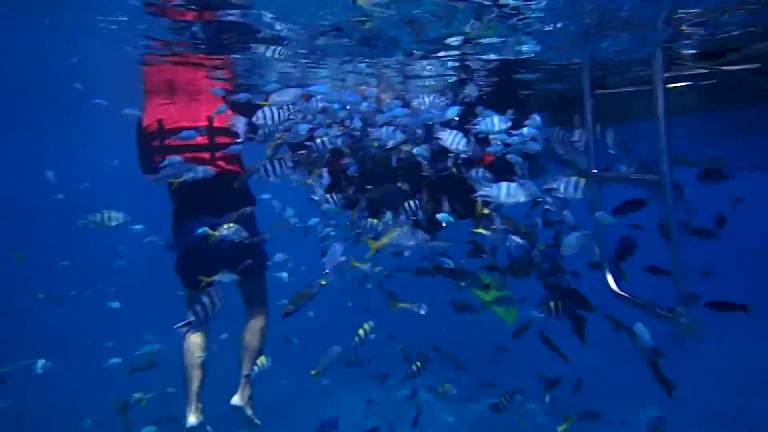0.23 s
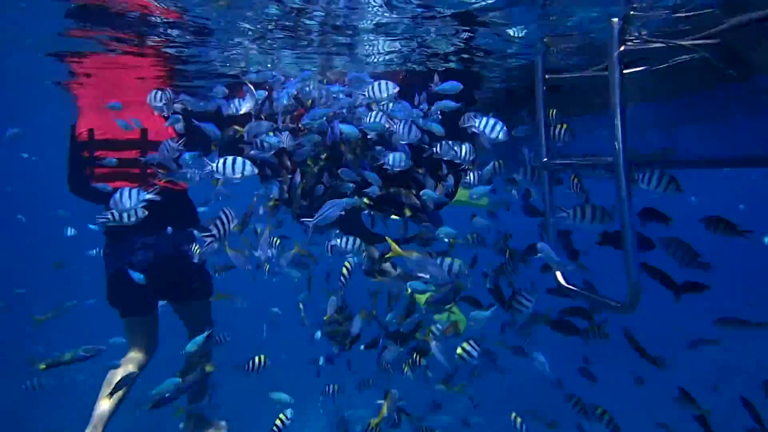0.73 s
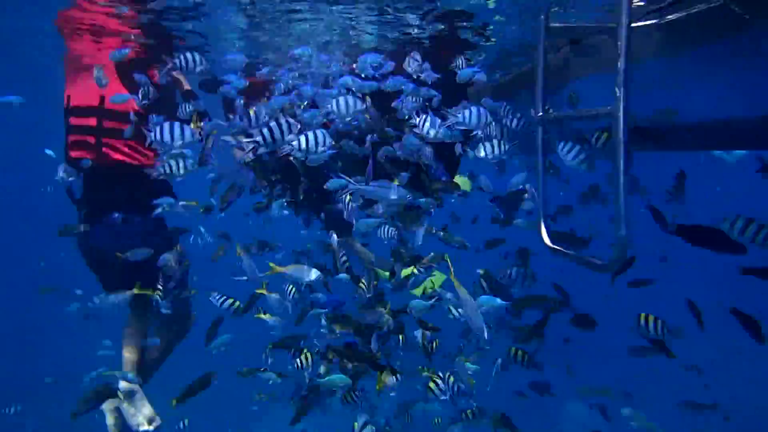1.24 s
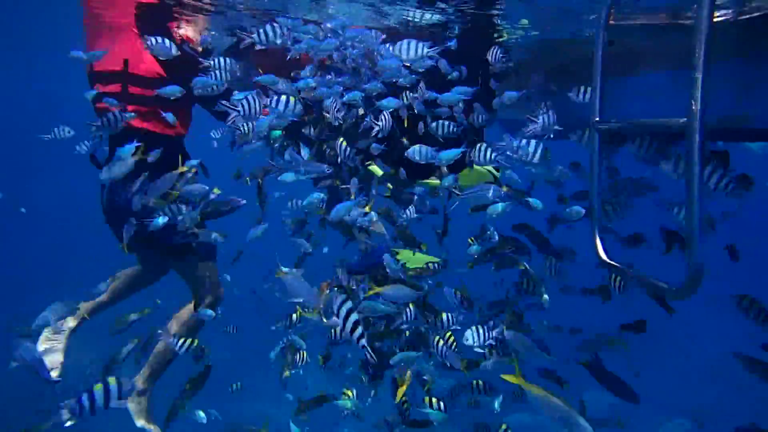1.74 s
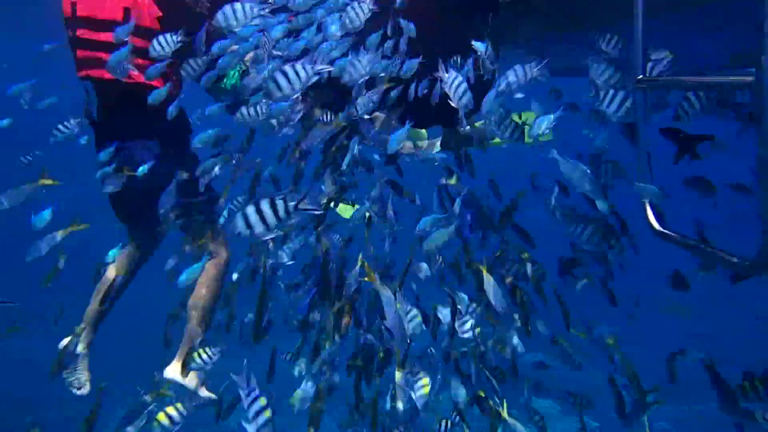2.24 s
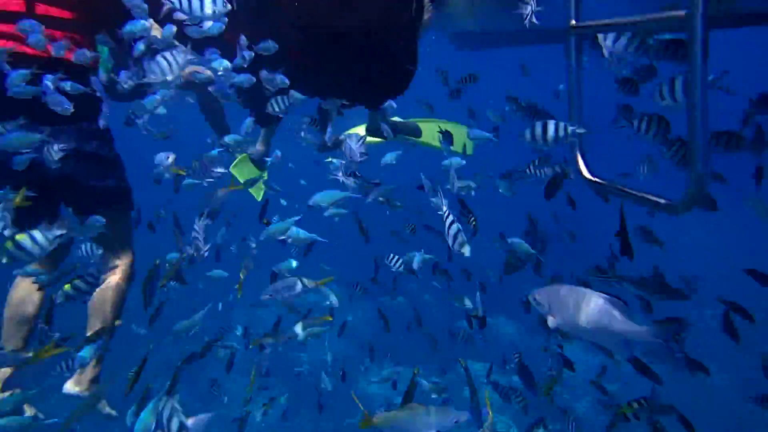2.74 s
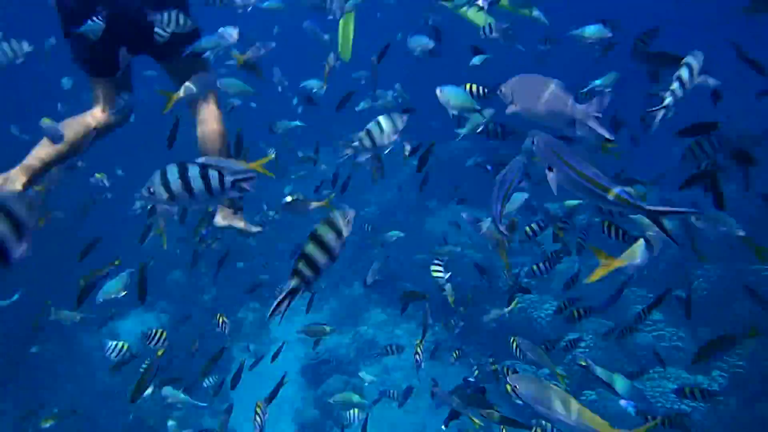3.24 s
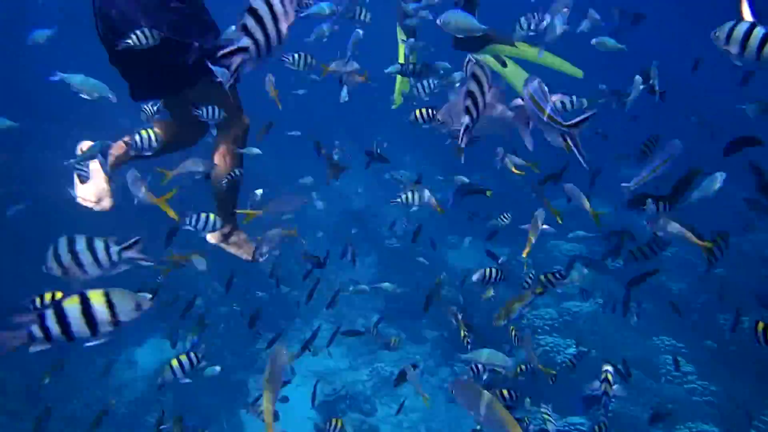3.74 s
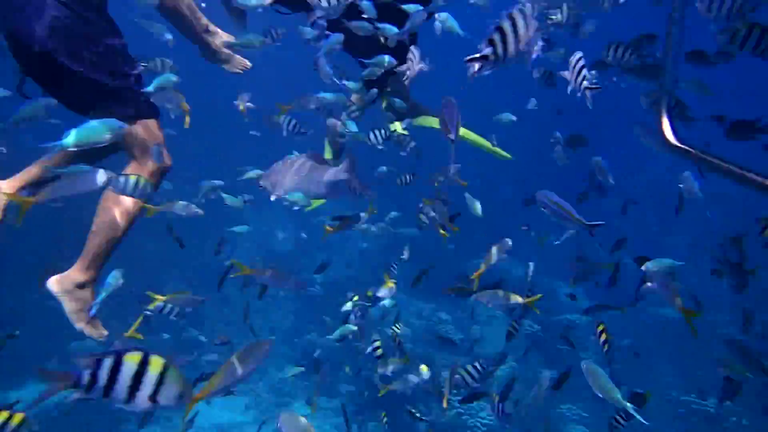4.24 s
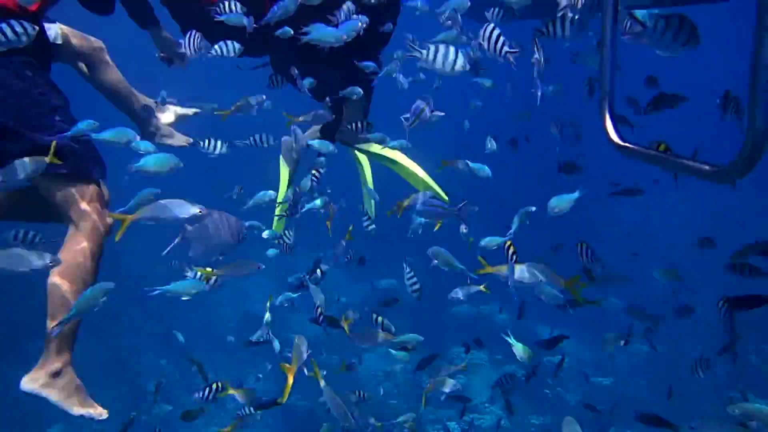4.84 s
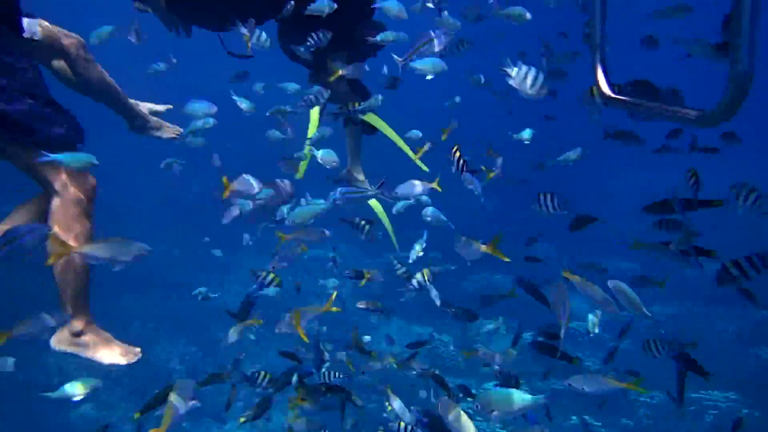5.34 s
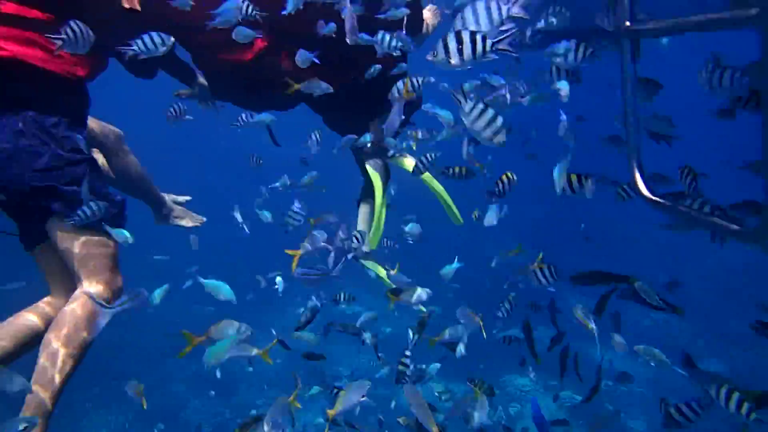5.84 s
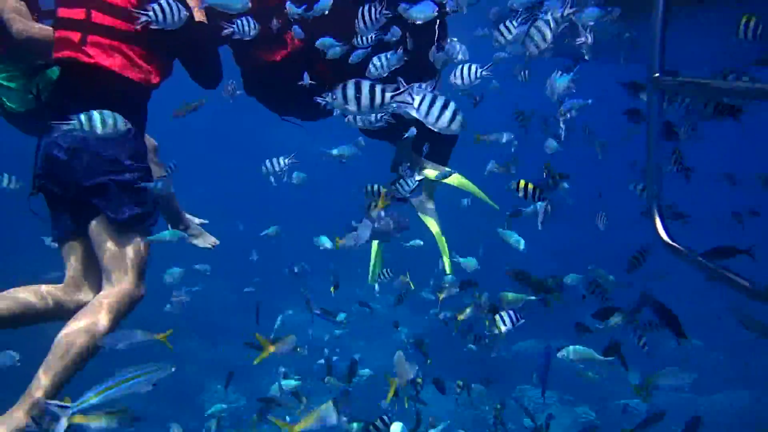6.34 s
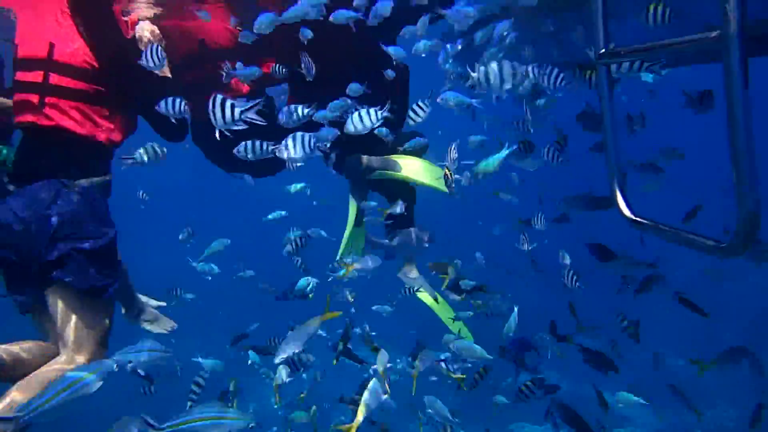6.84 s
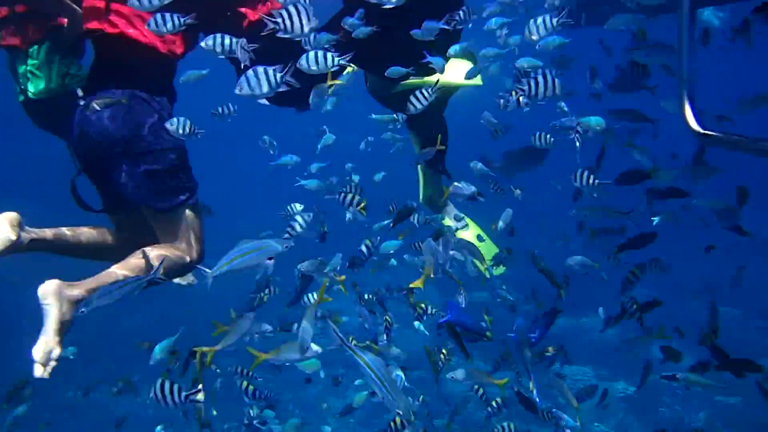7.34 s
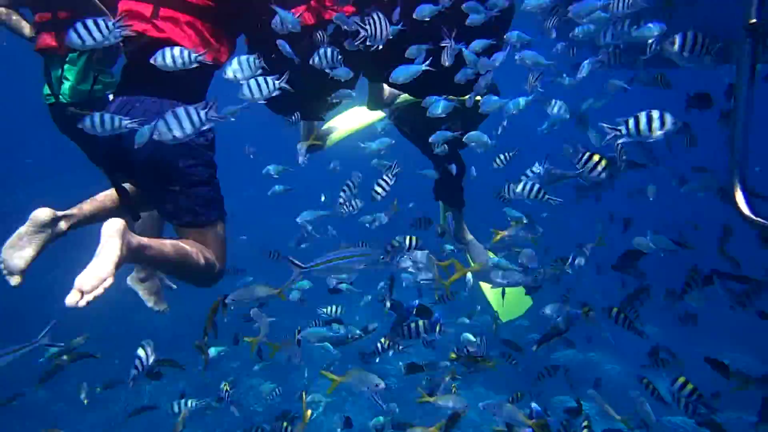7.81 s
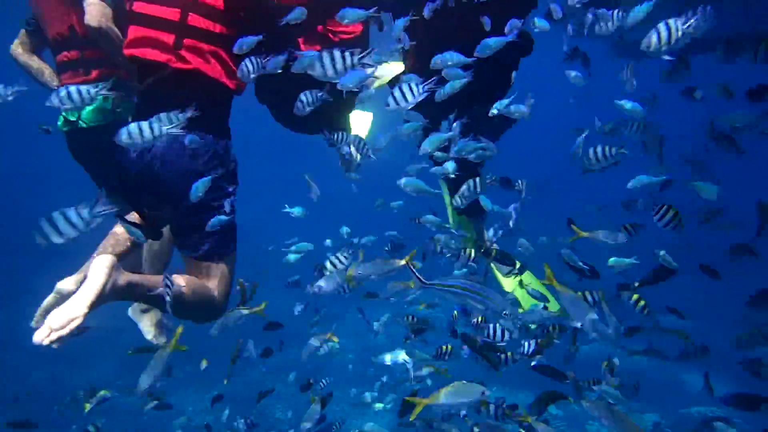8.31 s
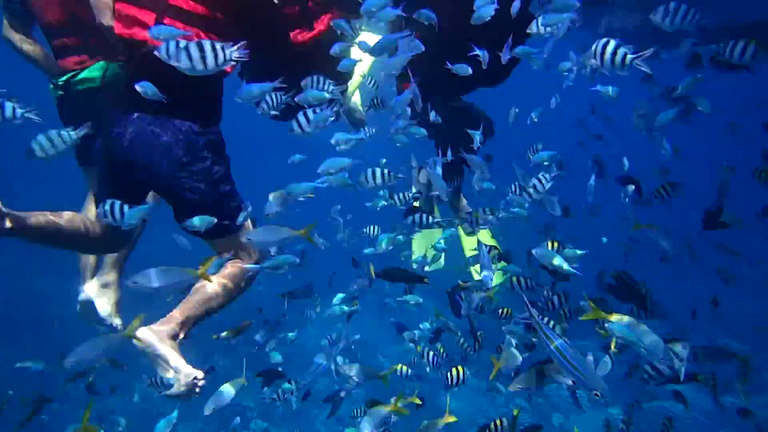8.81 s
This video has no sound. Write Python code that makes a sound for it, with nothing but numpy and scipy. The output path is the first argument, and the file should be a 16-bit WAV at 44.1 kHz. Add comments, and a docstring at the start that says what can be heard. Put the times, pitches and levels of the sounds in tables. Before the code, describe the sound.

A sealed camera underwater picks up bubbles popping and glugging close by, water washing round a hull and dull taps on its case. Behind them an idling engine holds its buzzing hum, and reef crackle spits dry ticks without pause. Bubbling is thickest in the first three seconds, thinner mid-way, then busier again toward the end. The steady background ducks suddenly after bumps and climbs back.

```python
"""Under water beside a moored boat

A steady engine drones through the hull as damped-sine bubbles and shaped noise make slosh, gurgle and wash.
Reef snaps, from fizz to single cracks, are spikes ringing a sealed camera housing, which also takes blunt taps.
Two microphone ports hear it all with unequal gain and phase, over hiss; the level of the steady sounds
drops at listed moments and climbs back.
"""
import sys
import numpy as np
from scipy import signal
from scipy.fft import rfft, irfft, next_fast_len
from scipy.io import wavfile
from scipy.ndimage import uniform_filter1d, minimum_filter1d, map_coordinates

SR = 44100
rng = np.random.default_rng(int(sys.argv[2]) if len(sys.argv) > 2 else 0)


def dump_mix(stems):
    """Bounce the given channels to the path in sys.argv[1] as a 16-bit WAV at rate SR."""
    frames = np.atleast_2d(stems).T  # one column per channel
    limited = np.clip(frames, -1, 1)  # hard clip at full scale
    pcm = np.round(limited * 32767).astype(np.int16)
    wavfile.write(sys.argv[1], SR, pcm)


N = 399987
T = np.arange(N) / SR  # seconds

NOTCH_HZ, FLANK_HZ = 3400, 5420  # between the housing's two cavity resonances; flank of the high one meets its top
# Colour of the sealed housing. Each row: frequency in Hz, relative level in dB.
HOUSING_COLOUR = [(900, -14), (1500, -13.5), (2400, -6), (3000, -9.5), (3600, -11), (4000, -22),
                  (4400, -16), (5500, -2.5), (6050, -0.5), (6300, 2.5), (6550, -0.5), (6900, -12),
                  (8500, -21.5), (9500, -21.5), (16000, -31.5)]


def amp(db):
    """Gain of a level in dB."""
    return 10 ** (np.asarray(db) / 20)


def unit(x):
    """x at rms 1."""
    return x / np.sqrt(np.mean(x ** 2) + 1e-20)


def along(points, hz, column=1):
    """One column of a table of frequencies, read on a log axis."""
    rows = np.transpose(points)
    return np.interp(np.log(hz + 1), np.log(rows[0] + 1), rows[column])


def closed(points):
    """The gain of a spectrum that falls away outside its ends."""
    below, above = (points[0][0] / 2, -80), (points[-1][0] * 2, -80)
    return lambda hz: amp(along([below, *points, above], hz))


def wobble(rate):
    """A smooth random curve, rate knots a second."""
    knots = rng.standard_normal(int(N * rate / SR) + 4)
    return map_coordinates(knots, [np.arange(N) * rate / SR])


def noise():
    """White noise."""
    return rng.standard_normal(N)


def filtered(x, response):
    """x times a complex response of frequency."""
    m = next_fast_len(N + 8192)
    return irfft(rfft(x, m) * response(np.fft.rfftfreq(m, 1 / SR)), m)[..., :N]


def causal(gain):
    """The minimum-phase response with this gain shape, peak 1: a spike rings after it, never before."""
    def response(hz):
        cepstrum = irfft(np.log(gain(hz) + 1e-6))
        half = len(cepstrum) // 2
        ring = np.exp(rfft(np.r_[cepstrum[0], 2 * cepstrum[1:half], np.zeros(half)]))
        return ring / np.abs(irfft(ring)).max()
    return response


def ports(x, diffuse):
    """One sound at both ports: unequal gain, the right turned later, and for diffuse sound a scrambled part."""
    # Port differences. Each row: frequency in Hz, left minus right in dB, left lead in radians, likeness 0-1.
    port_pair = [(90, -2.6, 0.1, 0.7), (300, -4.2, -0.0, 0.98), (430, -7.1, 0.2, 0.91),
                 (500, -8.6, 0.9, 0.84), (570, -4.0, 1.1, 0.78), (700, -0.5, 0.4, 0.92),
                 (1000, 0.4, 0.1, 0.98), (2000, 0.1, -0.2, 0.93), (2500, -3.2, -0.5, 0.88),
                 (2900, -7.6, -0.2, 0.81), (3200, -6.1, 0.7, 0.64), (4500, -2.2, 1.4, 0.88),
                 (6300, 3.7, 2.4, 0.85), (6800, 8.2, 4.4, 0.19), (7200, 5.6, 6.4, 0.67),
                 (8500, -0.6, 7.7, 0.62), (10000, -1.3, 9.4, 0.4), (12000, -3.5, 7.6, 0.26)]
    half_gain = lambda hz: amp(along(port_pair, hz) / 2)
    angle = lambda hz: diffuse * np.arccos(np.clip(along(port_pair, hz, column=3), 0, 1)) / 2

    def both(hz):
        shared_phase = np.exp(1j * np.angle(causal(half_gain)(hz)))
        right = np.exp(-1j * along(port_pair, hz, column=2)) / half_gain(hz)
        return shared_phase * [half_gain(hz), right]

    z = signal.stft(x, nperseg=512)[2]
    random_phase = np.exp(2j * np.pi * rng.random(z.shape))
    scrambled = signal.istft(z * random_phase, nperseg=512)[1][:N]
    alike = filtered(x, lambda hz: both(hz) * np.cos(angle(hz)))
    # opposite signs at the two ports pull them apart
    unlike = filtered(scrambled, lambda hz: 0.65 * both(hz) * np.sin(angle(hz)) * [[1], [-1]])
    return alike + unlike


def rings(s, size, hz, cycles, rise, length=3000):
    """Damped sines with a soft start and a rising pitch, one for each bubble, each peaking at its size."""
    t = np.arange(length) / SR
    age = t * (hz / cycles)[:, None]  # in decay times
    envelope = np.exp(-age) * (1 - np.exp(-6 * age))
    shape = envelope * np.sin(2 * np.pi * hz[:, None] * t * (1 + rise * age / 2))
    shape = shape * (size / np.abs(shape).max(axis=1))[:, None]
    at = np.round(s * SR).astype(int)[:, None] + np.arange(length)
    return np.bincount(at.ravel(), shape.ravel(), N + length)[:N]


def swarm(count, centre_hz, spread, cycles, uneven_db, rise, size):
    """Many random bubbles around a pitch that may drift, rms 1; size is each ring's length in samples."""
    place, loud = rng.random((2, count))
    centre = np.broadcast_to(centre_hz, N)[(place * N).astype(int)]
    hz = centre * np.exp(spread * rng.standard_normal(count))
    peaks = amp(-uneven_db * np.log(loud + 0.026))
    return unit(rings(place * N / SR, peaks, hz, np.full(count, cycles), rise, size))


def surging(calm_db, surges):
    """Gain that swells out of the calm, holds and dies back for each surge."""
    swell_db_per_s, fade_db_per_s = 244, 105
    db = np.full(N, float(calm_db))
    for s, hold_s, top_db, *_ in surges:
        away_db = np.maximum(swell_db_per_s * (s - T), fade_db_per_s * (T - s - hold_s))
        db = np.maximum(db, top_db - np.maximum(0, away_db))
    return amp(db)


def impulses(s, db):
    """One single-sample spike at each time."""
    return np.bincount(np.round(s * SR).astype(int), amp(db), N)


def snapped(low, flank, top):
    """Pressure spikes with a short scattered tail ring the housing's cavities, each spike in its own shares."""
    def scattered(spikes, size, t60):
        tail = amp(-60 * np.arange(1, 2500) / SR / t60)
        return spikes + size * noise() * signal.fftconvolve(spikes, tail)[:N]

    below = lambda hz, edge_hz: 1 / (1 + (hz / edge_hz) ** 14)
    housing = lambda hz: closed(HOUSING_COLOUR)(hz) / (1 + (hz / 11000) ** 4)
    shares = (lambda hz: below(hz, NOTCH_HZ),
              lambda hz: below(hz, FLANK_HZ) - below(hz, NOTCH_HZ),
              lambda hz: 1 - below(hz, FLANK_HZ))
    echoes = ((0.035, 0.05), (0.12, 0.007), (0.14, 0.013))  # tail in each band: size, t60 in seconds
    return sum(filtered(scattered(spikes, *echo), causal(lambda hz: housing(hz) * share(hz)))
               for spikes, echo, share in zip((low, flank, top), echoes, shares))


def hiss():
    """Each microphone's own noise, brighter toward the top."""
    return amp([[-63], [-60.5]]) * filtered(rng.standard_normal((2, N)), lambda hz: (hz / 10000) ** 0.73)


def fizz():
    """Far reef snaps melt into a clumped fizz of noise; the low cavity clumps on its own."""
    shared_db = 1.5 * wobble(7) + 3 * wobble(110)
    low = lambda hz: 1 / (1 + (hz / NOTCH_HZ) ** 8)
    colour = closed(HOUSING_COLOUR)
    dull = amp(3.4 * wobble(7.4) + 1.3 * wobble(40)) * filtered(noise(), lambda hz: colour(hz) * low(hz))
    bright = amp(1.2 * wobble(12)) * filtered(noise(), lambda hz: colour(hz) * (1 - low(hz)))
    return amp(-45) * unit(amp(shared_db) * (dull + bright))


def crackle():
    """Nearer snaps stand out singly as random spikes; a few are much stronger than the rest."""
    fires = rng.random(N) < 320 / SR * amp(6 * wobble(9))  # the rate, in snaps a second, wanders around 320
    size = fires * amp(4.5 * rng.exponential(size=N).clip(0, 2.3))
    low, flank, top = size * amp([[-10], [-6], [-1]]) * amp(4.8 * rng.standard_normal((3, N)))
    return amp(-41.0) * unit(snapped(low, flank, top))


def snaps():
    """The nearest snaps of the reef, one spike each into the housing's cavities."""
    # Nearest snaps. Each row: time in seconds, level in dB in the low cavity, on the high one's flank, at its top.
    near_snaps = [(0.0278, -38, -23, -20.5), (0.1172, -42.5, -29.5, -26), (0.3446, -40, -29, -35),
                  (0.3797, -38, -32.5, -31.5), (0.3942, -31, -35, -25.5), (0.423, -37, -22, -26),
                  (0.5184, -55, -41, -24), (0.537, -55, -40, -24.5), (0.5959, -28.5, -35, -30),
                  (0.6387, -26, -45, -27), (0.654, -37, -42.0, -30), (0.744, -26.5, -26, -35),
                  (0.7651, -21.5, -15.5, -28), (0.771, -34.5, -32, -26), (0.8613, -36, -29, -39),
                  (1.0134, -32, -31, -25.5), (1.1427, -50, -44, -26), (1.147, -41, -32, -27.5),
                  (1.1956, -38, -43, -29), (1.2027, -36, -45.5, -46.0), (1.3416, -35, -32, -26.5),
                  (1.3924, -36, -36, -25), (1.4996, -34, -34.0, -30.5), (1.6002, -37, -30.5, -23),
                  (1.6114, -25, -38, -42), (1.6799, -39, -31.0, -33), (1.7605, -34, -38, -22.5),
                  (1.8146, -51, -37, -24.5), (1.8866, -33, -33.0, -24), (1.898, -18.5, -17, -14.0),
                  (1.9051, -25, -28, -24), (2.0951, -49, -33, -29), (2.1633, -55, -39, -32.5),
                  (2.3265, -36, -43.5, -31.0), (2.3983, -57, -32, -25), (2.5242, -36, -41, -27.5),
                  (2.5842, -36, -38, -34.5), (2.6081, -37, -50, -31), (2.8166, -47.5, -32, -35.5),
                  (2.9264, -51, -40, -27), (2.9432, -25, -26, -39), (2.966, -48.0, -33, -30.5),
                  (2.9836, -31, -30, -18.5), (3.076, -20.5, -22, -30), (3.091, -34, -47, -22.5),
                  (3.2224, -33.0, -26, -23), (3.2377, -33, -35, -28), (3.252, -45.0, -30.0, -22.5),
                  (3.2815, -40, -38, -32), (3.3302, -38, -29.5, -23.5), (3.3915, -25.5, -38.5, -34),
                  (3.4557, -56, -45, -33.5), (3.5148, -29, -30.5, -21.5), (3.5245, -20, -19, -27.5),
                  (3.536, -32, -30, -25), (3.551, -22, -32, -23), (3.5592, -29.5, -28, -24),
                  (3.5755, -30, -19.5, -23.5), (3.579, -33, -46, -30), (3.7522, -60.0, -34, -25),
                  (3.8812, -41, -24, -23), (3.9172, -22, -43.0, -48), (3.9273, -39, -27, -21.5),
                  (3.947, -27, -40, -28.0), (3.9675, -38, -32.5, -37), (3.9897, -42, -34, -34),
                  (4.1001, -21.5, -19, -30), (4.113, -28, -29, -23.5), (4.137, -25.0, -28, -27.5),
                  (4.1829, -21.5, -14, -21), (4.2284, -27, -31.0, -35), (4.2447, -20.5, -18, -19),
                  (4.2533, -25, -29.5, -42), (4.4211, -16.5, -18, -20.5), (4.4267, -25, -37, -36),
                  (4.4686, -26.5, -24, -13.5), (4.4975, -44, -31, -26), (4.634, -35, -34.5, -31),
                  (4.6962, -27, -23, -23.5), (4.9007, -45, -40.5, -27.5), (4.9251, -21, -12.5, -20),
                  (4.9967, -24, -26.0, -28), (5.01, -44, -29, -31), (5.0204, -40, -21, -22),
                  (5.0329, -12.5, -18, -16.5), (5.04, -32, -40.0, -35), (5.1168, -15, -18, -19),
                  (5.1356, -45, -22, -41), (5.146, -18, -22, -21.0), (5.1551, -25.0, -39, -40),
                  (5.2708, -31, -27.5, -28.5), (5.2826, -50, -42, -31), (5.3172, -43, -33, -28),
                  (5.4809, -19, -46, -40.0), (5.5213, -29, -45, -24), (5.637, -25.5, -36, -26.5),
                  (5.671, -28, -29, -23.5), (5.6985, -59.5, -32, -27.0), (5.7168, -28, -28.5, -26),
                  (5.7263, -39, -34.0, -30.5), (5.7997, -29, -19, -14.5), (5.8032, -37, -30.0, -22.5),
                  (5.8133, -26, -15, -14), (5.8485, -32.5, -31, -19), (5.864, -49, -40, -33),
                  (5.8893, -33, -24, -32), (5.9134, -41.0, -29, -33), (5.9373, -59.5, -40, -25),
                  (6.0082, -41.0, -27, -29), (6.0633, -48.5, -40, -29), (6.1178, -54, -31, -27),
                  (6.1423, -28, -18, -23), (6.204, -46, -43, -30), (6.2497, -26, -22.5, -30),
                  (6.3036, -51, -35, -27), (6.3101, -32, -19.5, -14), (6.3486, -23, -34, -20),
                  (6.3532, -23, -18, -22.5), (6.5041, -18, -17, -14.5), (6.5116, -35, -37, -29),
                  (6.6553, -51, -34.5, -28), (6.7418, -43.0, -32, -22.5), (6.758, -39.5, -29, -21.5),
                  (6.8044, -20.5, -26, -37), (6.8353, -30, -29, -31), (6.8649, -27.5, -29, -17),
                  (7.0162, -50, -34, -31.5), (7.1177, -31, -23, -17), (7.2061, -28, -33, -34),
                  (7.2632, -37, -32.0, -24.5), (7.2744, -29.5, -23, -25), (7.3109, -39, -25, -28.0),
                  (7.3988, -38, -35, -24), (7.4568, -30, -23, -18.5), (7.463, -32, -33, -31),
                  (7.4673, -37.5, -33.5, -28), (7.474, -32, -32, -21), (7.5245, -33, -39.5, -24.5),
                  (7.5844, -26, -28, -24), (7.5892, -15.5, -16, -20.5), (7.5975, -28, -28, -28),
                  (7.6417, -43, -44, -26.5), (7.71, -26, -46.0, -41), (7.7151, -35, -29.5, -25.5),
                  (7.8072, -31, -31, -20), (7.8207, -37.0, -23, -22.5), (7.8897, -25, -34, -34),
                  (7.907, -31, -31.0, -26.5), (7.9199, -30, -27, -31), (7.9354, -63, -44, -35),
                  (7.9566, -20.5, -21, -28), (7.9711, -36, -30.5, -22), (8.148, -44.5, -38.5, -26),
                  (8.1785, -56, -38, -35), (8.1874, -51, -31, -30.5), (8.2283, -43.5, -29, -21),
                  (8.2321, -27, -24, -22.5), (8.2417, -59, -45, -34), (8.2612, -36, -17.5, -19.5),
                  (8.2683, -41.5, -32.0, -29), (8.2788, -41.5, -28, -26.5), (8.2856, -41, -30, -28),
                  (8.3154, -49, -35.0, -24.5), (8.345, -18.5, -16, -22), (8.4123, -31, -42.0, -47.0),
                  (8.446, -24, -28, -33), (8.4719, -37.0, -29, -23), (8.494, -37, -33, -21.5),
                  (8.5184, -31.0, -30.5, -18), (8.5596, -49.0, -36, -34), (8.6128, -23, -19, -13),
                  (8.6233, -35.0, -30, -26), (8.7023, -56, -36, -34), (8.7458, -31, -39.0, -50),
                  (8.752, -40.0, -45, -32.0), (8.783, -50, -39, -38), (8.9412, -45, -39.5, -31.5),
                  (8.9855, -42, -30.0, -23), (9.013, -51, -41, -36), (9.051, -49, -40.0, -28.5)]
    s, *levels_db = np.transpose(near_snaps)
    return snapped(*(impulses(s, db) for db in levels_db))


def slosh():
    """Low lumpy noise of moving water, swelling in surges."""
    # Slosh spectrum. Each row: frequency in Hz, relative level in dB.
    slosh_colour = [(12, -35), (20, -4.5), (65, 4), (160, -5), (210, -11.5), (350, -120)]
    # Low surges. Each row: start in seconds, hold in seconds, level in dB.
    low_surges = [(0.145, 0.095, -7.5), (.75, 0.21, -24), (1.308, 0.017, -18.5), (1.778, 0.015, -18.5),
                  (2.045, 0.025, -22.5), (2.4, .02, -17), (2.623, 0.016, -20), (2.902, 0.054, -20.5),
                  (3.376, 0.028, -22.5), (3.83, .02, -23), (4.32, 0.37, -24.5), (5.043, .12, -23),
                  (5.532, 0.013, -13), (6.23, 0.018, -28), (6.482, 0.018, -21), (6.85, 0.022, -15.5),
                  (7, 0.52, -21), (7.655, 0.016, -15.5), (7.97, 0.37, -25), (8.644, 0.36, -25.5)]
    lumps = amp(3.8 * wobble(16)) * filtered(noise(), closed(slosh_colour))
    return surging(-27.5, low_surges) * unit(lumps)


def gurgle():
    """A crowd of large ringing bubbles whose centre pitch drifts from burst to burst."""
    # Bursts of gurgling. Each row: start in seconds, hold in seconds, level in dB, centre pitch in Hz.
    gurgle_bursts = [(0.14, 0.057, -8.5, 162), (0.434, 0.046, -18, 295), (0.7, 0.2, -19.5, 331),
                     (1.194, 0.11, -23, 243), (1.526, 0.012, -25, 275), (2.05, 0.27, -13, 254),
                     (2.547, 0.21, -15, 292), (3.253, 0.25, -21, 299), (3.943, 0.51, -30.5, 297),
                     (4.544, 0.14, -27.5, 269), (5.64, 0.012, -22, 239), (6.352, 0.13, -21.5, 284),
                     (6.85, 0.12, -28.5, 253), (7.213, 0.12, -31, 274), (7.631, 0.025, -17.5, 272),
                     (8.256, 0.015, -30, 216), (8.652, 0.018, -26, 276), (8.964, 0.039, -21, 244)]
    s, hold_s, _, hz = np.transpose(gurgle_bursts)
    pitch_hz = np.interp(T, s + hold_s / 2, hz)
    bubbles = swarm(count=1800, centre_hz=pitch_hz, spread=0.2444, cycles=2.67, uneven_db=1.5,
                    rise=0.031, size=2600)
    return surging(-34.5, gurgle_bursts) * bubbles


def wash():
    """Noisy wash around the hull, with fine bubbles and small high ones that crowd its strongest moments."""
    # Wash spectrum. Each row: frequency in Hz, relative level in dB.
    wash_colour = [(100, -3.5), (200, -2.5), (400, 0.5), (500, 4), (570, -1.5), (650, -7), (820, -13.5),
                   (1000, -18), (1300, -29.5), (1700, -29), (2500, -38)]
    # Level of the wash noise over time. Each row: time in seconds, level in dB.
    wash_curve = [(0, -17), (.11, -18.5), (.2, -17), (.5, -24), (.75, -18.5), (1.1, -19.5), (1.3, -20.5),
                  (1.6, -25), (2.6, -19.5), (2.8, -27), (3, -19.5), (3.6, -26.5), (3.85, -22), (4.5, -27.5),
                  (4.7, -23), (5.3, -29), (6.3, -27), (8.4, -27), (8.65, -25.5), (9, -28.5)]
    wash_db = np.interp(T, *np.transpose(wash_curve))
    rush = unit(amp(4.4 * wobble(25) + 1.22 * wobble(8)) * filtered(noise(), closed(wash_colour)))
    fine = swarm(count=1400, centre_hz=634.6, spread=0.204, cycles=3.9, uneven_db=2.0, rise=0.042, size=1000)
    chirps = swarm(count=2400, centre_hz=1005, spread=0.13, cycles=3.8, uneven_db=1.5, rise=0.025, size=1500)
    chirp_db = -23.5 + 0.63 * (wash_db - wash_db.mean())
    return amp(wash_db) * (rush + amp(-7.5) * fine + amp(chirp_db) * chirps)


def water():
    """Slosh, gurgle and wash, spread diffusely over the two ports."""
    return ports(slosh(), diffuse=1.7) + ports(gurgle() + wash(), diffuse=1.9)


def single_bubbles():
    """Bubbles close to the housing, each a damped sine of slightly rising pitch."""
    # Single bubbles. Each row: start in seconds, level in dB, starting pitch in Hz, decay time in cycles.
    near_bubbles = [(.039, -23.5, 624, 19), (0.058, -22, 249, 5.3), (0.123, -16.5, 164.3, 4.3),
                    (0.166, -19, 153, 1.6), (0.173, -20, 535, 2.8), (.205, -22, 130, 1.8),
                    (0.214, -26, 574, 1.6), (.24, -16, 147.6, 2.7), (0.266, -22.5, 550, 4.9),
                    (0.555, -17, 335, 2.6), (.577, -14, 343, 2.8), (.593, -12.5, 335, 3),
                    (.6385, -11.5, 344, 1.8), (.71, -25.5, 766, 13), (0.734, -9.5, 360, 2.2),
                    (.992, -2, 322, 2.1), (1.09, -11, 428, 3.4), (1.311, -19, 191, 3.6),
                    (1.322, -15, 422, 1.2), (1.486, -16, 327, 5.7), (1.525, -9.5, 280, 1.9),
                    (1.552, -16, 790, 1.7), (1.859, -23.5, 100.5, 5), (1.882, -15.5, 759, 8.6),
                    (2.031, -21, 218.4, 19), (2.06, -7, 212.8, 4), (2.107, -16, 225, 3.7),
                    (2.128, -17, 830, 2.3), (2.13, -13, 507, 5.8), (2.236, -10, 298, 3.3),
                    (2.264, -10.5, 248, 4.1), (2.28, -30, 806, 16), (2.343, -26.5, 241, 15),
                    (2.36, -18.5, 83.5, 3), (2.37, -27, 776, 8.1), (2.372, -35, 1490, 12),
                    (2.385, -19, 492, 7.4), (2.443, -17.5, 309, 5.7), (2.488, -21, 298, 6.3),
                    (2.559, -18, 578, 7.6), (2.598, -12, 463, 2.4), (2.607, -17.5, 289, 3.4),
                    (2.754, -24.5, 478, 5.9), (2.962, -21.5, 560, 4), (3.007, -16, 287, 7),
                    (3.116, -10.5, 308, 4), (3.168, -13.5, 283, 1.3), (3.261, -11, 287, 3.6),
                    (3.403, -16, 282, 2.7), (3.452, -19, 313, 4.7), (3.741, -32, 995, 11),
                    (3.793, -29, 980, 7.6), (3.872, -35, 1390, 6.7), (3.882, -13, 424, 8.2),
                    (3.925, -24, 820, 2.4), (4.01, -27, 870, 6.4), (4.05, -25, 836, 14),
                    (4.147, -19.5, 268, 5.5), (4.231, -11, 333, 2.9), (4.389, -18.5, 550, 4.6),
                    (4.367, -25, 142, 5.5), (4.546, -20.5, 153, 0.96), (4.732, -15, 429, 1.6),
                    (4.919, -18.5, 411, 6.4), (5.33, -17, 278, 6.7), (5.519, -19, 489, 4),
                    (5.66, -37, 1060, 12), (5.734, -29, 1080, 4.1), (5.861, -21.5, 301, 3.4),
                    (6.015, -17, 592, 8.6), (6.129, -34, 1130, 6.9), (6.213, -19, 64, 1.9),
                    (6.357, -10.5, 562, 1.3), (6.611, -27.5, 105.6, 3.9), (6.635, -12, 555, 3.8),
                    (6.712, -17.5, 710, 4.2), (6.764, -8, 433, 1.7), (7.007, -20, 1000, 9.2),
                    (7.003, -32, 1230, 9.4), (7.053, -29.5, 1104, 14), (7.054, -31, 955, 14),
                    (7.056, -43, 1390, 7.9), (7.105, -36, 940, 8), (7.135, -42, 1420, 5.8),
                    (7.248, -37, 885, 4), (7.298, -43, 1100, 5.3), (7.316, -39, 1410, 7),
                    (7.092, -17.5, 493, 12), (7.122, -17.5, 475, 5.1), (7.132, -25.5, 995, 11),
                    (7.169, -8.5, 500, 3.3), (7.309, -37, 1280, 8), (7.321, -15, 332, 2),
                    (7.42, -14.5, 494, 7), (7.583, -14.5, 224, 5.8), (7.589, -14, 334, 3.6),
                    (7.632, -16, 601, 7.3), (7.648, -10, 502, 9.1), (7.813, -12.5, 577, 2.7),
                    (7.822, -19, 503, 8.5), (7.894, -14.5, 441, 9.9), (7.928, -22, 652, 7.1),
                    (7.989, -17.5, 288, 3.4), (8.086, -16.5, 295, 3.4), (8.088, -18.5, 489, 11),
                    (8.239, -16.5, 345, 3.6), (8.273, -18.5, 101.5, 2.7), (8.334, -21.5, 95.5, 2.1),
                    (8.493, -26, 310, 4.5), (8.839, -12, 298, 4.9), (8.862, -14.5, 764, 2.2),
                    (8.912, -36, 1310, 12), (8.948, -11.5, 700, 1.7)]
    s, db, hz, cycles = np.transpose(near_bubbles)
    return rings(s, amp(db), hz, cycles.clip(.5, 30), rise=0.014)


def taps():
    """A blunt push on the housing: a sharp crest, a deep trough, a rebound."""
    # Taps. Each row: start in seconds, level in dB.
    housing_taps = [(.489, -21.5), (.659, -13), (.741, -13), (0.7651, -10), (.618, -19), (.891, -31),
                    (.997, -7.5), (1.166, -29), (1.199, -13.5), (1.49, -15.5), (2.131, -8.5),
                    (2.731, -12.5), (2.761, -18.5), (2.977, -14), (3.579, -7), (3.876, -20), (3.927, -11.5),
                    (4.011, -36), (4.555, -14.5), (4.739, -14), (4.765, -11.5), (5.032, -20.5), (5.48, -8),
                    (5.522, -10.5), (5.61, -25.5), (6.347, -23), (6.362, -2), (6.527, -12), (6.769, -7),
                    (7.174, -12), (7.053, -24), (7.328, -19.5), (7.997, -14.5), (8.411, -3), (8.446, -16),
                    (8.498, -9.5), (8.642, -13), (8.746, -7.5), (8.95, -15)]
    tap_hz, rise_s, fall_s = 535, 0.001194, 0.0018
    s, db = np.transpose(housing_taps)
    t = np.arange(-200, 600) / SR  # the trough is at zero
    push = -np.cos(2 * np.pi * tap_hz * t) * np.exp(np.minimum(t / rise_s, -t / fall_s))
    first_contact = 0.53 * np.exp(-((t + .3 / tap_hz) / 0.00038) ** 2 * 4)
    return signal.fftconvolve(impulses(s + rise_s, db), push + first_contact)[200:N + 200]


def engine():
    """Two unlike firings a cycle put the odd low multiples a quarter turn off; the high ones line up as one knock."""
    # Hull tones. Each row: multiple of the engine cycle, level in dB around which the tone wavers.
    hull_tones = [(14, -45.5), (18, -51), (22, -38), (24, -40.5), (30, -44.5), (31, -45.5), (32, -29),
                  (33, -32.5), (34, -26), (35, -33), (36, -53), (37, -42), (38, -41), (39, -45.5),
                  (40, -40.5), (41, -40), (42, -38), (43, -36.5), (44, -46), (45, -57), (46, -52),
                  (47, -46), (48, -59), (49, -58), (50, -60), (51, -55), (52, -54.5), (53, -57),
                  (54, -50.5), (55, -47.5), (56, -50.5), (57, -67.5), (58, -66)]
    cycle_hz = 14.985
    drone = np.zeros(N)
    for k, db in hull_tones:
        start_s = .0557 if k < 37 else .005  # the hull's low ring swells later than the knock
        quarter = np.pi / 2 * (k % 2) * (k < 46)
        level = np.sqrt(2) * amp(db + 1.35 * wobble(6) + 2.0 * wobble(1.496))
        waver = 0.34 * wobble(9)  # radians
        drone += level * np.cos(2 * np.pi * k * cycle_hz * (T - start_s) + quarter + waver)
    return drone


def beside():
    """Port gains: while a burst of bubbles passes the left port, left rises and right falls."""
    passing = uniform_filter1d(1. * (T > 0.1145) * (T < .285), size=600)
    return amp(np.outer([3.5, -11.5], passing))  # left, right in dB


def sinking():
    """Each drop of level recovers exponentially in dB; where drops overlap the deepest one holds."""
    # Sudden drops of level. Each row: time in seconds, depth in dB before a brief smoothing.
    level_drops = [(0, -9.5), (0.129, -22), (0.223, -20), (0.278, -23), (0.664, -10), (0.747, -11),
                   (1.001, -10), (1.207, -15.5), (1.331, -10.5), (1.533, -6.5), (1.911, -5), (2.075, -6.5),
                   (2.135, -15.5), (2.282, -11.5), (2.417, -10.5), (2.584, -8.5), (2.732, -12), (3.014, -8),
                   (3.121, -7.5), (3.296, -7.5), (3.585, -11.5), (4.054, -2.5), (4.253, -4.5),
                   (4.562, -8.5), (4.744, -13), (5.366, -3), (5.482, -5.5), (5.525, -7.5), (6.312, -4),
                   (6.368, -8), (6.521, -6), (6.784, -15), (7.173, -11), (7.321, -7), (7.647, -7),
                   (7.913, -2), (8.01, -5.5), (8.416, -4.5), (8.653, -7), (8.953, -4.5)]
    recovery_s = 0.17
    db = np.zeros(N)
    for s, depth_db in level_drops:
        db = np.minimum(db, depth_db * np.exp(-np.abs(T - s) / recovery_s) * (T >= s))
    return amp(uniform_filter1d(db, size=130))


def scene():
    """The steady sounds and the microphone hiss sink together; near events stand in front."""
    reef = ports(fizz(), diffuse=1.3) + ports(crackle(), diffuse=1.8)
    steady = hiss() + reef + water() * beside() + ports(engine(), diffuse=0)
    near = ports(single_bubbles() + taps(), diffuse=0.23) * beside()
    return steady * sinking() + near + ports(snaps(), diffuse=0.3)


def record(dry):
    """A fast limiter holds the peaks; the deepest bass is cut and nothing is kept above the band limit."""
    top_hz, bass_cut_hz = 15750, 25
    needed = np.minimum(1, 0.47 / (np.abs(dry).max(axis=0) + 1e-9))
    gain = uniform_filter1d(minimum_filter1d(needed, size=200), size=200)
    return filtered(dry * gain, lambda hz: (hz < top_hz) * hz ** 2 / (hz ** 2 + bass_cut_hz ** 2))


dry = scene()
out = record(dry)
dump_mix(out)
```